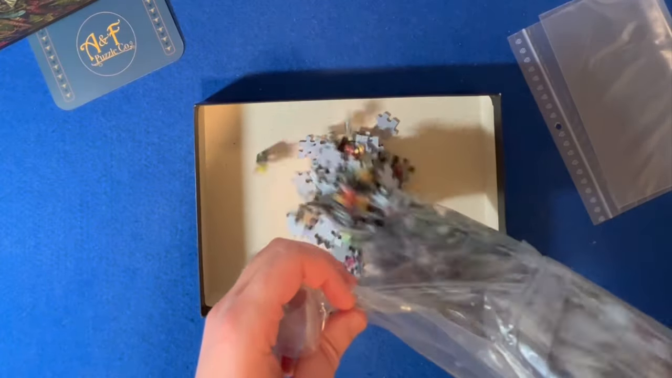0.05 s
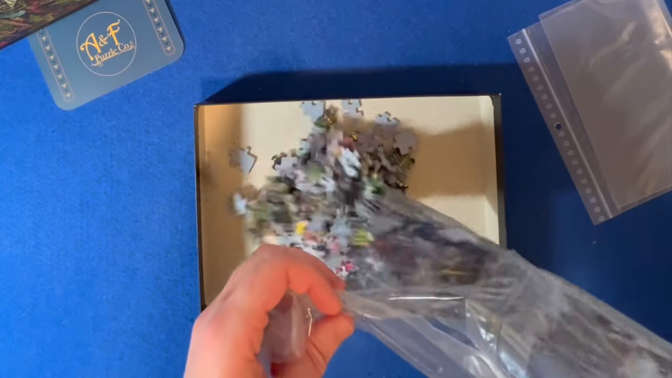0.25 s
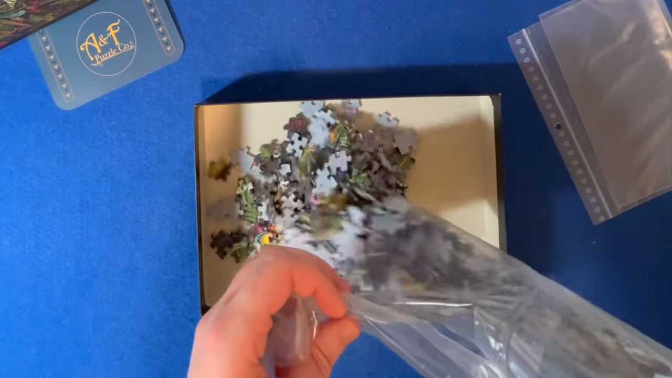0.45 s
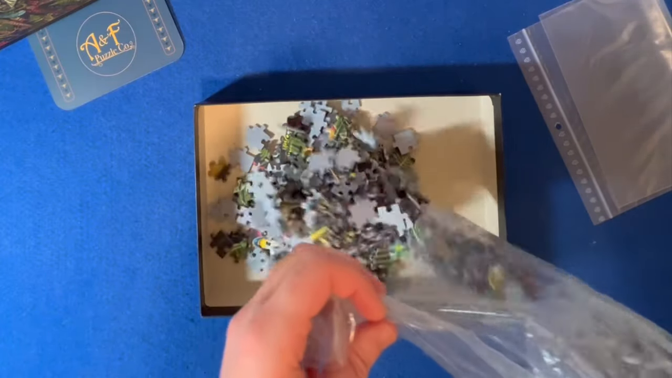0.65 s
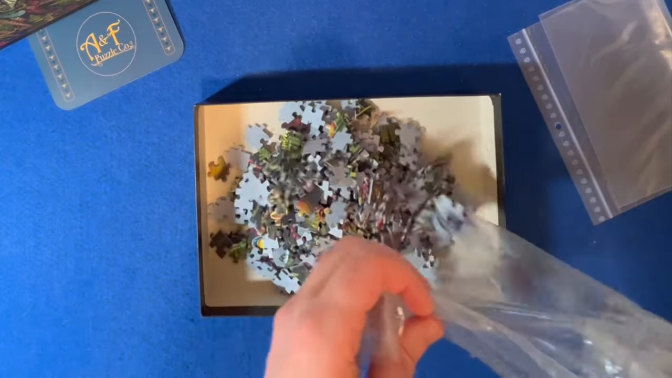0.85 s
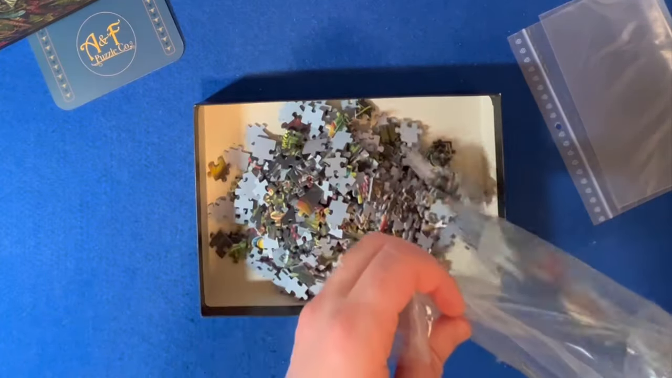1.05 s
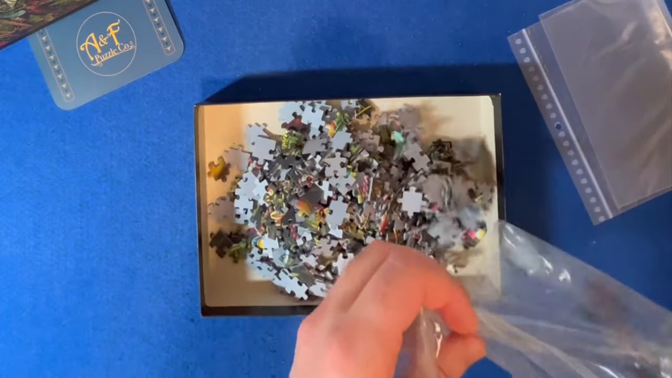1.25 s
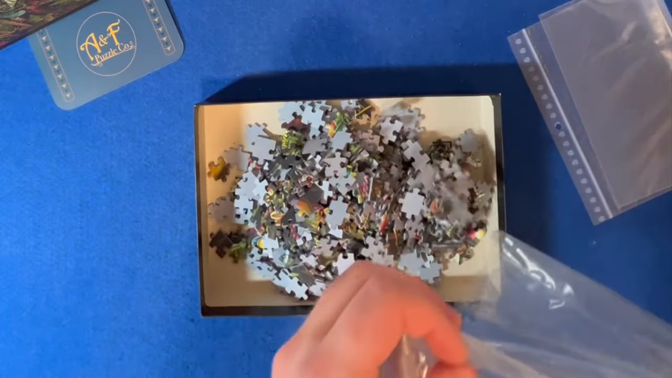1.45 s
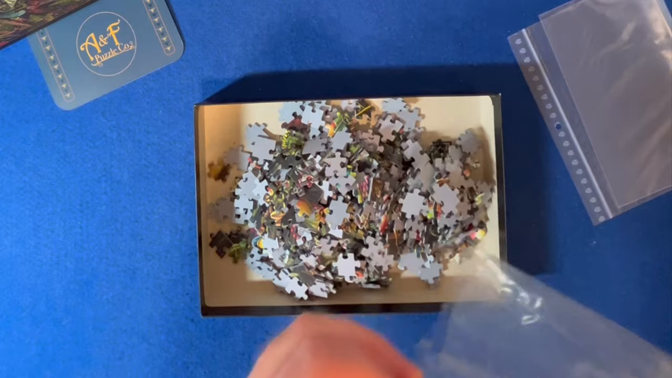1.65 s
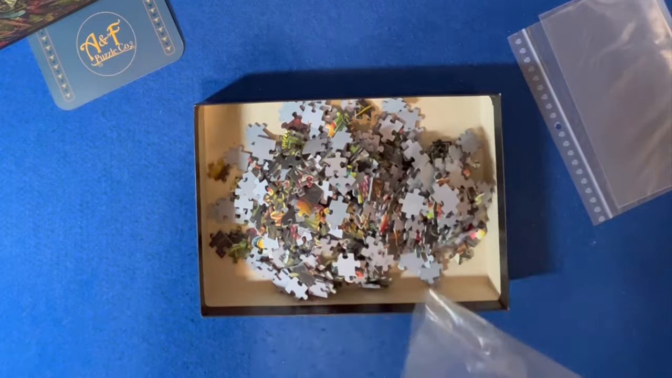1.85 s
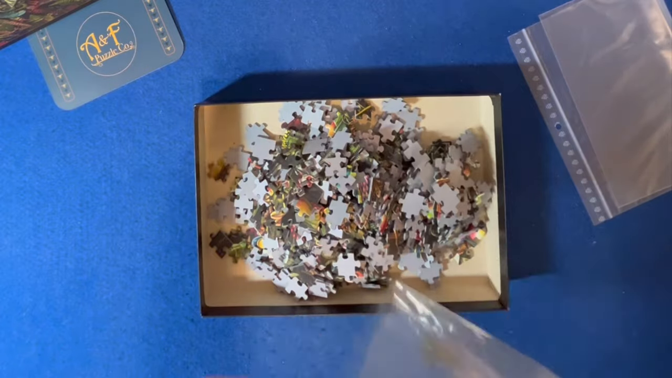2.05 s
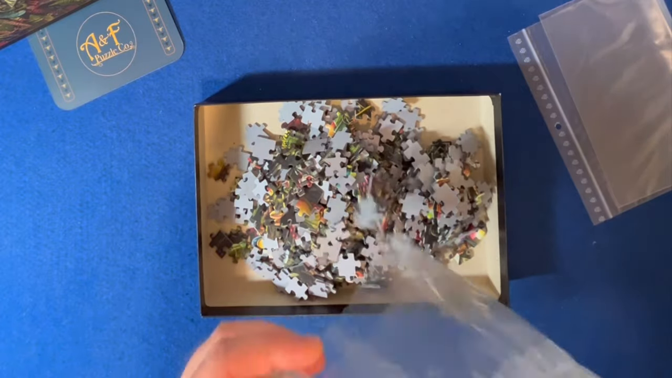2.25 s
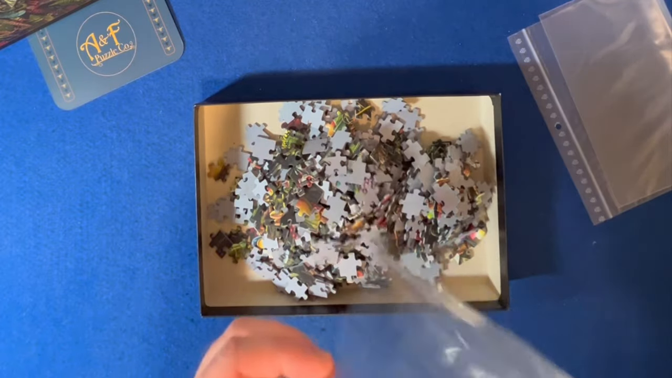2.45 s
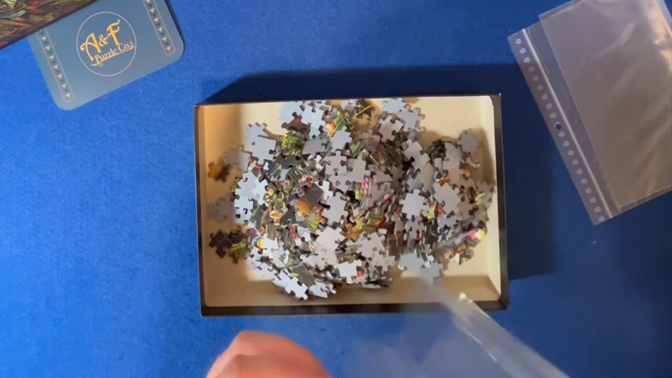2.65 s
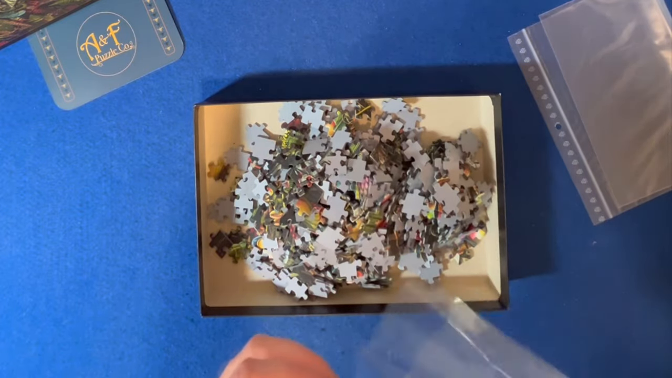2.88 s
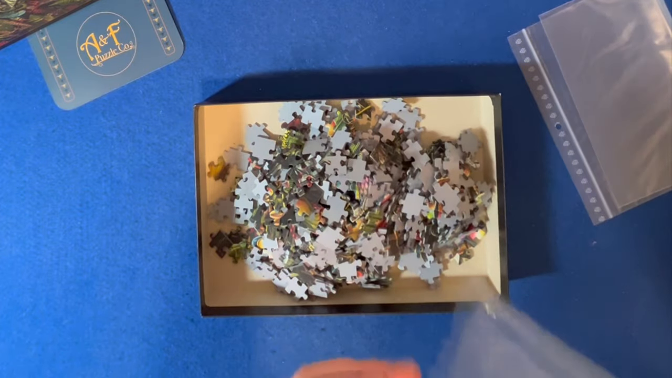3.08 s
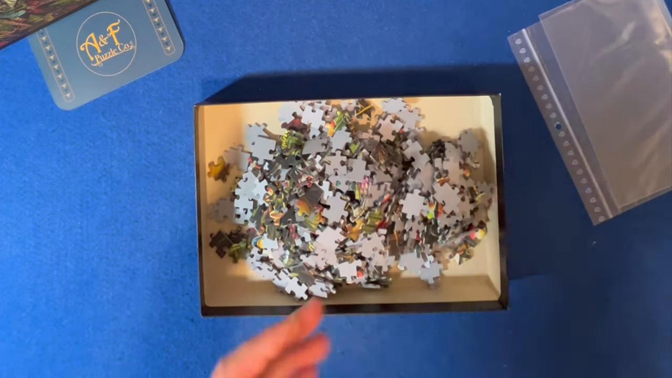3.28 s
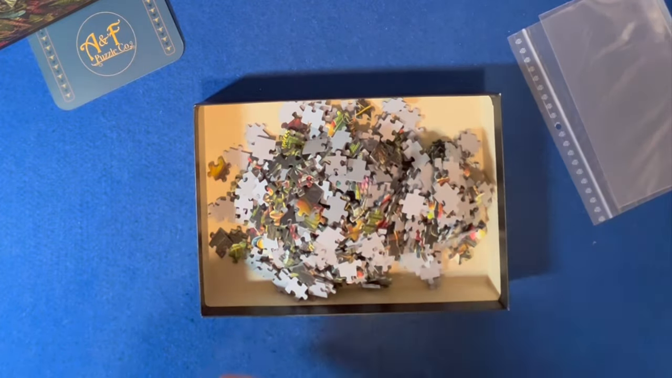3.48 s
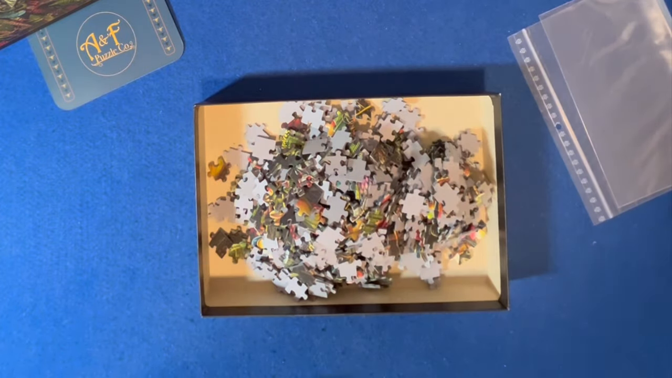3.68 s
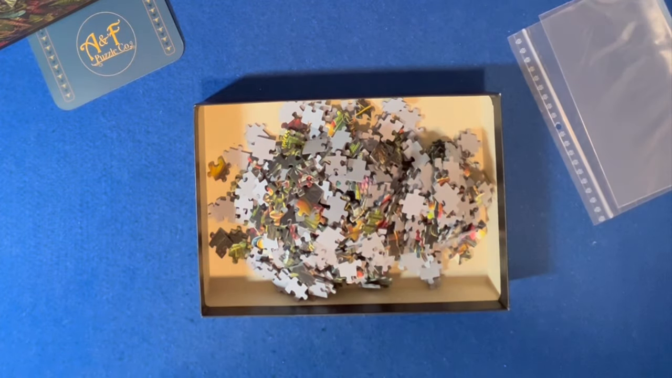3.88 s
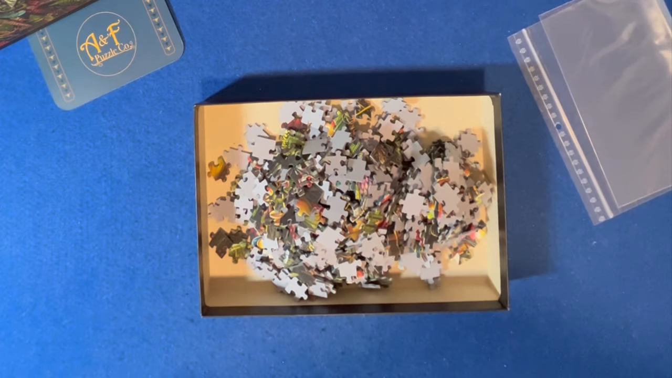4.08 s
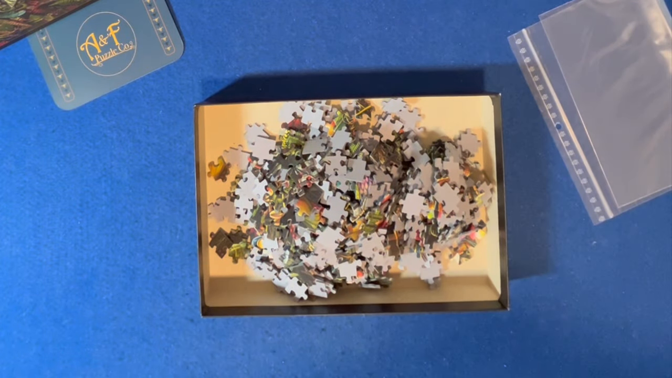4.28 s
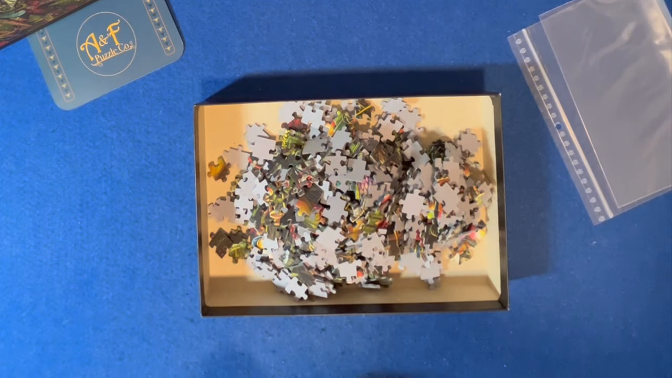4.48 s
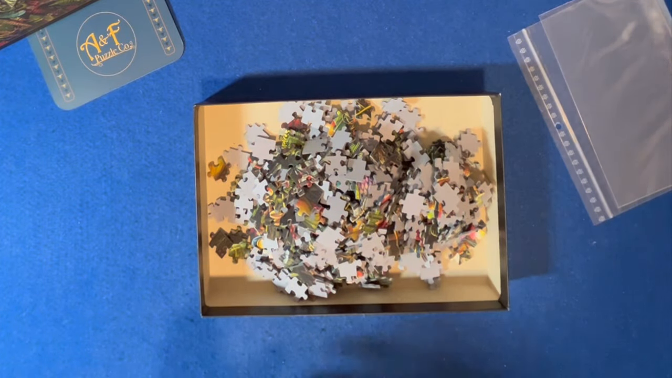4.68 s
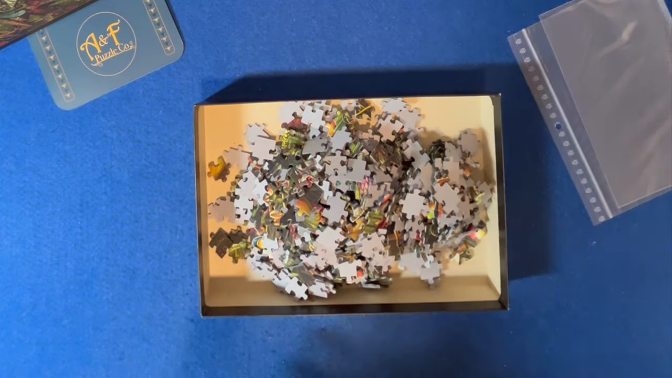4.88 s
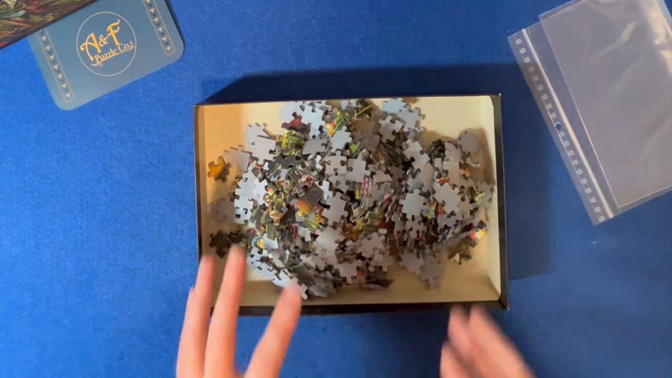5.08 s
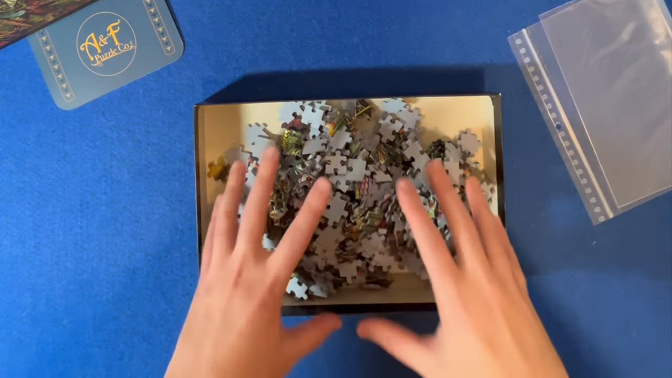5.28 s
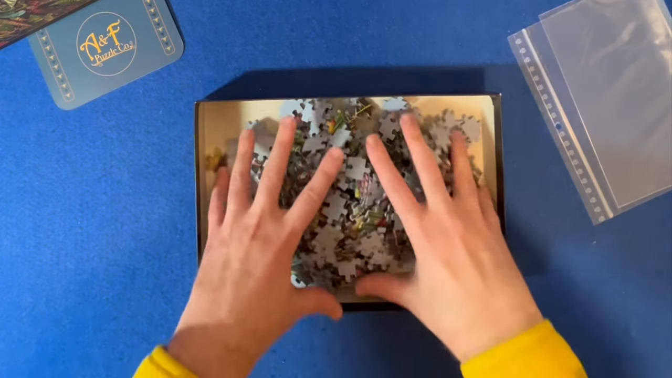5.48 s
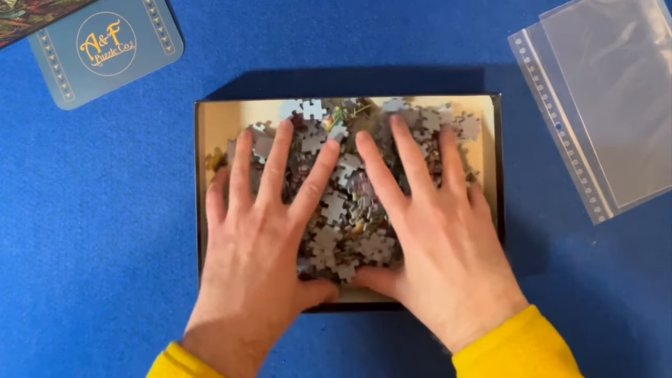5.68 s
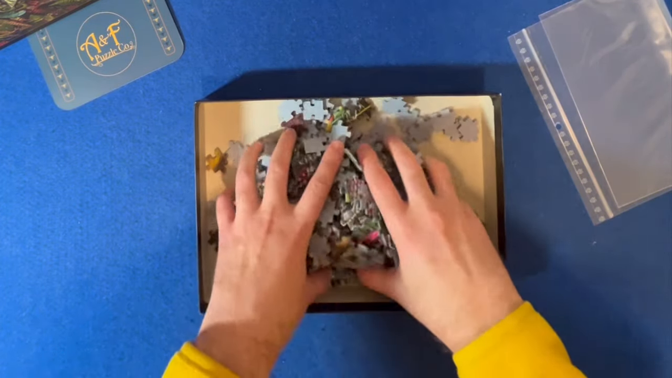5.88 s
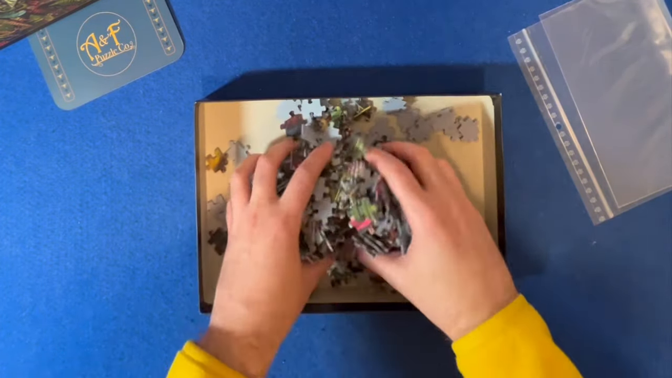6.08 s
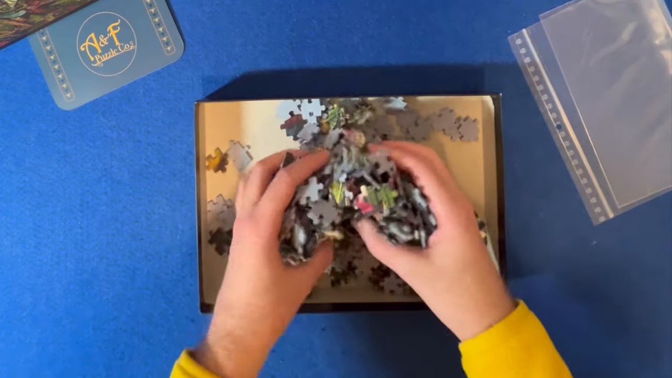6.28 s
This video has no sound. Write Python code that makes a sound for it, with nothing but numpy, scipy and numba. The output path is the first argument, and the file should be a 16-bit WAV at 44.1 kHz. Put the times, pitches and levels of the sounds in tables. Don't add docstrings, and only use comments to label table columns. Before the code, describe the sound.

Dense dry rattle of puzzle pieces tumbling into a cardboard box, thin plastic bag crinkling, a quiet pause, then softer clacking as fingers gather them.

```python
import sys
import numpy as np
from scipy import signal
from scipy.fft import rfft, irfft
from scipy.io import wavfile
from numba import njit

SR = 44100
rng = np.random.default_rng(int(sys.argv[2]) if len(sys.argv) > 2 else 0)


def attenuation_scalar(level_db):
    decades = np.asarray(level_db, float) / 20
    return 10 ** decades


def pcm_store(signal):
    levels = np.round(np.clip(np.atleast_2d(signal), -1, 1) * 32767)
    wavfile.write(sys.argv[1], SR, levels.astype(np.int16).T)


N = 279594

# (time [s], hold [s], pieces level [dB], box floor re pieces [dB], bag level [dB])
POUR_SURGES = [(0, 0.13, -29, -13.5, -39), (0.141, 0.15, -30.5, -16, -38.5),
               (0.324, 0.089, -37, -12, -43.5), (0.456, 0.036, -40, -3.5, -52.5),
               (0.539, 0.044, -41.5, -14, -44.5), (0.648, 0.038, -35.5, -5.5, -45.5),
               (0.718, 0.0044, -34.5, -6.5, -51.5), (0.767, 0.029, -27.5, -6.5, -36.5),
               (0.834, 0.07, -35.5, -7.5, -46.5), (0.936, 0.054, -41, -2, -45),
               (1.077, 0.015, -57, 15.5, -51.5), (1.122, 0.088, -43, -3.5, -48.5),
               (1.239, 0.0081, -47, -0.5, -54.5), (1.282, 0.023, -45.5, 0, -51),
               (1.35, 0.0064, -45.5, -8, -71), (1.425, 0.017, -58, 4, -59), (1.473, 0.04, -46, -2, -66),
               (1.62, .08, -73.5, 2, -84.5)]
# (time [s], hold [s], pieces level [dB], box floor re pieces [dB], skin and sleeve level [dB])
GATHER_PUSHES = [
    (5.369, 0.061, -58.5, 2.5, -65),
    (5.449, 0.0068, -50.5, 1, -50.5),
    (5.5, 0.086, -58.5, 6.5, -65.5),
    (5.649, 0.12, -53, -6, -59.5),
    (5.739, 0.067, -44.5, -1.5, -45),
    (5.819, .06, -43.5, 0, -44),
    (5.948, 0.083, -44, 4, -46.5),
    (6.071, .12, -44.5, -2, -48.5),
    (6.24, 0.29, -42, -8, -50.5),
]
# (time [s], peak [dB], pitch [Hz])
POUR_CLACKS = [(.0099, -10.5, 1750), (.0271, -13, 1750), (.0396, -18, 1720), (.0567, -16, 1760),
               (.1044, -13, 1610), (.1267, -18, 1550), (.1537, -18.5, 1450), (.168, -18, 1540),
               (.174, -9, 1570), (.1956, -16, 1550), (.2149, -14, 1650), (.2379, -18, 1870),
               (.2517, -14, 1790), (.2645, -19, 1930), (.2838, -17.5, 2100), (.2956, -18.5, 1670),
               (.3361, -22, 2090), (.3534, -15.5, 1600), (.3665, -16.5, 1850), (.4048, -24, 1490),
               (.4165, -24, 1500), (.4553, -26, 1840), (.54, -21, 1900), (.5585, -22, 1710),
               (.5833, -23, 2130), (.6186, -24, 1680),
               (0.6583, -15, 1630), (0.7153, -12, 1880), (0.7185, -19.5, 1840), (0.7455, -11.5, 1850),
               (0.757, -24, 1620), (0.7603, -12.5, 1590), (0.7646, -11, 1850), (0.7704, -10.5, 1880),
               (0.776, -18, 1830), (0.785, -20, 1990), (0.819, -21, 1480), (0.8469, -14, 1870),
               (0.936, -21.5, 1610), (0.9519, -18, 1890), (0.99, -28.5, 1660), (1.067, -24, 1620),
               (1.1234, -29, 1880), (1.1302, -23, 1840), (1.1628, -20.5, 1470), (1.1858, -28.5, 1430),
               (1.241, -32, 1500), (1.284, -24.5, 1850), (1.301, -23.5, 1850), (1.344, -30.5, 1850),
               (1.3513, -36.5, 1850), (1.475, -34.5, 1980), (1.491, -29.5, 1870)]
# (time [s], peak [dB], pitch [Hz])
HAND_CLACKS = [(5.3558, -64, 1520), (5.37, -49.5, 1940), (5.4059, -34.5, 1920), (5.4479, -28, 1660),
               (5.5246, -42.5, 1590), (5.5458, -36, 1680), (5.633, -38.5, 1800), (5.67, -48.5, 1830),
               (5.679, -48.5, 1560), (5.7077, -35.5, 1840), (5.7479, -28, 1890), (5.7572, -23, 1850),
               (5.764, -33, 1770), (5.7861, -23, 1900), (5.8272, -29, 1580), (5.9522, -24.5, 1790),
               (5.9649, -31.5, 1550), (5.983, -23, 1943), (6.0117, -26, 2017), (6.0314, -25, 1970),
               (6.0457, -30, 1717), (6.0765, -30.5, 1850), (6.0946, -32.5, 1601), (6.1102, -29, 1800),
               (6.1277, -32, 1685), (6.1478, -28.5, 1745), (6.1912, -30.5, 1530), (6.2227, -36, 1788),
               (6.2497, -30.5, 1640), (6.2612, -30.5, 1547), (6.2971, -34.5, 1850), (6.3304, -30.5, 1658)]
# (frequency [Hz], width [Hz], level [dB])
BOX_MODES = [(118.2, 20, 1), (241, 13, 3.5), (329, 27, 1), (375, 11, 5.5), (486, 40, -9)]
# (time [s], hold [s], rustle [dB], crackle re rustle [dB], thud re rustle [dB])
BAG_SHAKES = [(1.57, 0.04, -78.5, -27.5, 20), (1.72, 0.0085, -93, -4.5, 0),
              (1.82, 0.093, -59.5, -11.5, 1.5), (1.92, 0.027, -50, -14.5, 2.5),
              (1.99, 0.02, -47.5, -27, -1), (2.08, 0.039, -49.5, -13.5, -3.5), (2.13, 0.09, -49, -14, -1.5),
              (2.26, 0.056, -51.5, -5, 6.5), (2.34, 0.08, -52.5, -17, -2.5), (2.49, 0.012, -49, -14.5, 2.5),
              (2.56, 0.014, -50, -16.5, 2), (2.65, 0.013, -46, -16, 3), (2.72, 0.02, -51, -21, 3.5),
              (2.82, 0.0059, -52.5, -12.5, 4.5), (2.9, 0.015, -56, -16, 8), (2.99, 0.042, -52, -11.5, -0.5),
              (3.11, 0.0087, -53.5, -7, -7.5), (3.18, 0.021, -53.5, -25, 2.5)]
# (time [s], hold [s], rustle [dB], crackle re rustle [dB], thud re rustle [dB])
SLOW_MOVES = [(3.34, 0.019, -90.5, -3.5, 7.5), (3.51, 0.057, -87.5, -2.5, 8),
              (3.69, 0.052, -64.5, -18, -0.5), (4.11, 0.027, -65.5, -12.5, -1),
              (4.19, 0.033, -66.5, -7.5, -8), (4.29, 0.043, -59, -10, -6.5), (4.44, 0.0139, -64, -32, -3.5),
              (4.8, 0.15, -70, -13, -5), (4.97, 0.047, -63.5, -31, -1), (5.06, 0.0315, -82.5, 3.5, 19),
              (5.19, 0.023, -65.5, -30, -1)]
# (time [s], peak [dB], thin top re peak [dB])
TICKS = [(0.0094, -23.5, -13), (0.1118, -45, -10), (0.122, -19, -18), (0.171, -29, -4), (0.2138, -28, 11.5),
         (0.2462, -27, -4), (0.2627, -27, -6), (0.2821, -36, -6), (0.3281, -34, -6), (0.3521, -22.5, -8),
         (0.3643, -25, -10), (0.3846, -37, -6), (0.4037, -32, -6), (0.4119, -23, -8), (0.5386, -30, -16),
         (0.543, -29, -10), (0.5821, -29, -12), (0.5926, -38, -10), (0.7726, -27.5, -6),
         (0.837, -23.5, -14), (0.8472, -23, -6), (0.8645, -29, -6), (0.9055, -27.5, -1), (0.95, -32, -6),
         (0.9663, -35.5, 7), (1.0378, -26.5, -3), (1.067, -27, -4), (1.1057, -25.5, -6), (1.1415, -24, -6),
         (1.1816, -25, -8), (1.2057, -25, -1), (1.2402, -33, -3), (1.258, -29.5, -6), (1.3236, -32, -8),
         (1.4072, -29, -6), (1.4278, -25.5, -2), (1.4477, -28.5, -6), (1.5235, -40, -3.5),
         (5.4041, -44, -7), (5.4465, -43, -9), (5.5452, -50, 2), (5.5967, -50, -6), (5.6865, -45, -4),
         (5.7049, -42, -4), (5.7868, -31, -6), (5.8274, -26.5, -4), (5.859, -34.5, -1), (5.8985, -44, -6),
         (5.9547, -39.5, -6), (6.0102, -39, -6), (6.0696, -37, -6), (6.1105, -34, -9), (6.132, -37, -6),
         (6.1478, -34.5, -8), (6.2224, -39, -10), (6.2627, -37.5, -6), (6.3304, -37, -10)]
# (time [s], peak [dB], bright re peak [dB], dull re peak [dB], ring [Hz])
NEAR_SNAPS = [(1.6868, -65, -4, -20, 3500), (1.7136, -59.5, -21, -6, 1500), (1.743, -60, -9, -21, 3500),
              (1.765, -62.5, -8.5, -20.5, 3500), (1.8128, -57, -29, 11.5, 1440),
              (1.8392, -44, -7, -1, 2500), (1.8895, -46.5, 0.5, -10, 2970), (1.918, -43.5, 0, 0, 1300),
              (1.931, -27, -2, -14, 3000), (1.9687, -44, -3, 5, 1280), (2.0655, -39.5, -2, -3.5, 1790),
              (2.1338, -34, -36, 3, 1790), (2.143, -34.5, -28, -11, 1500), (2.167, -39, 1.5, -15, 3000),
              (2.1728, -38.5, -1.5, -14, 1335), (2.195, -46.5, -0.5, -10, 2000), (2.2417, -39, 3, -7, 3000),
              (2.255, -45, 0, -6, 2500), (2.2659, -41, 1.5, -4, 4000), (2.287, -42.5, -12.5, -12, 1520),
              (2.352, -38, -6, -23, 1480), (2.4714, -48, -7, -1, 2500), (2.2383, -39, 1, -2, 1600),
              (2.2809, -34.5, -7, 2, 1700), (2.3481, -38.5, 4, -21, 3630), (2.488, -39, -8, -0.5, 1400),
              (2.5028, -34, -0.5, -5, 3700), (2.5512, -33.5, -16.5, -11, 1610),
              (2.5642, -33, -24, -20, 1790), (2.5872, -33, -29, -31, 3040), (2.6472, -34, -14.5, -10, 3350),
              (2.6785, -33, -20.5, -22.5, 1940), (2.72, -38, -9.5, -4.5, 3310),
              (2.7407, -35, -48, -7, 1640), (2.804, -39, -16.5, -12, 1740),
              (2.8286, -36, -10.5, -2.5, 1660), (2.9912, -30, -11, -16, 4360), (3.003, -28, -9, -11, 2540),
              (3.109, -32.5, -9, -22.5, 2360), (3.1743, -55, -13, -10.5, 3560),
              (3.2486, -57, 3, -11.5, 3500), (3.1871, -34, -49, -9, 1750)]
# (time [s], peak [dB], bright re peak [dB], dull re peak [dB], ring [Hz])
FAR_SNAPS = [(3.3343, -53.5, -11.5, -22.5, 2624), (3.5117, -61, -14, -19, 1444),
             (3.636, -67, 1, -21.5, 2980), (3.907, -69, -4.5, -19, 3040), (4.0525, -62.5, -5, -21.5, 2530),
             (4.9207, -66.5, -10, -14.5, 1690), (3.6842, -42.5, -26, -20.5, 1660),
             (4.101, -51, -25.5, -18, 3960), (4.1815, -47, -1, -22, 2620), (4.2875, -46, -0.5, -14.5, 3040),
             (4.4302, -53.5, -24, -4, 1443), (4.9738, -58, -6, 4, 1600)]
# (time [s], peak [dB], pitch [Hz], swell [s])
CHIRPS = [
    (2.265, -41, 7600, 0.0018),
    (2.339, -42, 8650, 0.0092),
    (2.348, -40, 8760, .003),
    (5.827, -35, 7600, 0.0018),
]
# (time [s], peak [dB], pitch [Hz])
KNOCKS = [(0.66, -26.5, 250), (0.16, -36, 234), (.17, -32.5, 360), (0.89, -37.5, 245), (4.5, -51.5, 118),
          (5.045, -48, 112), (4.5, -52, 100), (3.71, -46.5, 124), (3.688, -55, 153), (4.436, -51, 124),
          (5.191, -48, 89.5), (5.364, -48.5, 390), (5.5, -47.5, 369.6), (5.45, -31, 98.3),
          (5.744, -23.5, 81), (6, -29.5, 126.8), (5.85, -28.5, 376), (5.7575, -27.5, 126),
          (5.8414, -30, 69.1), (6.001, -41, 227)]
# (frequency [Hz], level [dB], t60 [s])
EDGE_MODES = [(246, -3.5, 0.17), (596, 5, 0.015), (1400, -1, 0.033), (1740, -0.5, 0.027), (2340, 0, 0.03)]
# (frequency [Hz], level [dB])
FILM = [(3500, -30), (5200, 2.5), (7800, 0.5), (9500, 0.5), (12000, -7.5), (14000, -14), (16000, -14.5),
        (17000, -45.5)]
# (frequency [Hz], level [dB])
SHEEN = [(9000, -32), (11000, 0), (13000, -3), (15000, -4), (16200, -6.5)]
# (frequency [Hz], level [dB])
SWISH = [(900, -24.5), (1500, -1), (2200, 1), (3500, 0.5), (5300, -3), (7500, -23)]
# (frequency [Hz], level [dB])
RUSTLE = [(150, -19), (235, 3), (330, -3.5), (560, -3.5), (900, -1), (1400, -10), (2200, -44)]
# (frequency [Hz], level [dB])
THUD = [(22, -32.5), (40, -9.5), (70, 1), (120, -3.5), (180, -5), (300, -44)]
# (frequency [Hz], density [dB per Hz])
AIR = [(18, -37), (30, -4), (121, -3), (404, -22), (666, -22.5), (889, -27), (7870, -34), (10200, -38),
       (12600, -31.5), (16000, -70)]
# (frequency [Hz], left port lead [rad])
PORT_LEAD = [(0, 0), (430, -0.6), (950, 1.0), (1460, -0.2), (2580, 2.8), (3960, 1.2), (4910, 2.9),
             (6290, 3.6), (9730, 8.9), (10900, 10.1), (11900, 12.2), (13000, 12.7), (14000, 15.3),
             (16100, 16.4)]
# (frequency [Hz], left minus right [dB])
PORT_TILT = [(60, 3), (110, -3), (200, -3), (380, -4), (700, -1.5), (1290, 0.5), (2380, -2), (4400, -2),
             (8120, -0.5), (15000, 0)]

BARE_HZ, PIECE_HZ, COVERED_S = 1620, 1850, 0.057
BOUNCE_S, BOUNCE_DB = 0.0045, -7.5
RISE_DB_S, FALL_DB_S = 500, 252.5
SLOW_RISE_DB_S, SLOW_FALL_DB_S = 352, 181.5
THUD_RATE_SHARE = 0.61
SWISH_DB, SWISH_SHARE = 1.5, 0.38
POUR_CRACKLE_DB, POUR_THUD_DB = -6, -1.5
GATHER_CRACKLE_DB, GATHER_THUD_DB = -13, 0
STEADY_DB, CRACKLE_STEADY_SHARE, THUD_STEADY_SHARE = -45.5, 0.45, 0.59
FAR_FROM_S, FAR_TO_S = 3.3, 5.3
TAP_S, TAP_DB = 5.1805, -48
ROOM_T60_S, ROOM_DB, ROOM_LOW_HZ, ROOM_TOP_HZ = 0.038, -13, 330, 3960
AIR_DB = -63 - 8
TOP_HZ = 16250


def unit(x):
    return x / np.sqrt(np.mean(x ** 2) + 1e-30)


def colour(x, points):
    hz, db = np.transpose(points)
    log_f = np.log(np.fft.rfftfreq(N, 1 / SR) + 1)
    return irfft(rfft(x) * attenuation_scalar(np.interp(log_f, np.log(hz), db)), N)


def crowd(count, spread_db):
    chance = rng.random((count, 2))
    rarity = -np.log(1 - 0.93 * chance[:, 1])
    return chance[:, 0] * N / SR, attenuation_scalar(spread_db * rarity), rng.standard_normal((count, 2))


def bursts(s, size, pan_db, length_s, apart=0.):
    gate = np.zeros((2, N))
    at = np.clip((s * SR).astype(int), 0, N - 1)
    np.add.at(gate, (slice(None), at), size * attenuation_scalar(np.array([pan_db, -pan_db]) / 2))
    fall = np.exp(-1 / (length_s * SR))
    rise = np.exp(-1 / (0.75 * length_s * SR))
    gate = signal.lfilter([2 * (1 - rise)], np.convolve([1, -fall], [1, -rise]), gate)
    return gate * (rng.standard_normal(N) + apart * rng.standard_normal((2, N)))


@njit
def wavelets(s, size, hz, cycles, left, lag):
    out = np.zeros((2, N + 3600))
    for k in range(len(s)):
        tau = cycles[k] / hz[k] * SR
        for c in range(2):
            start = max(s[k] * SR + c * lag[k], 0.)
            gain = size[k] * (left[k] if c == 0 else 1 / left[k])
            for i in range(int(start) + 1, int(start + min(5 * tau, 3500.))):
                u = (i - start) / tau
                out[c, i] += gain * (u * np.exp(1 - u)) ** 2 * np.sin(2 * np.pi * cycles[k] * u)
    return out[:, :N]


def moves(table, db, rise_db_s, fall_db_s):
    t = np.arange(0, N, 32) / SR
    s, hold = np.transpose(table)[:2, :, None]
    before, after = np.maximum(s - t, 0), np.maximum(t - s - hold, 0)
    shape_db = db[:, None] - rise_db_s * before - fall_db_s * after
    return np.interp(np.arange(N) / SR, t, np.sqrt(np.sum(attenuation_scalar(shape_db) ** 2, axis=0)))


def heap():
    surges = POUR_SURGES + GATHER_PUSHES
    _, _, piece_db, box_db, _ = np.transpose(surges)
    patter_gain = moves(surges, piece_db, RISE_DB_S, FALL_DB_S)
    drum_gain = moves(surges, piece_db + box_db, RISE_DB_S, FALL_DB_S)

    s, size, chance = crowd(count=6000, spread_db=5.0)
    hz = np.interp(s, [0, COVERED_S], [BARE_HZ, PIECE_HZ]) * np.exp(0.15 * chance[:, 0])
    side = chance[:, 1]
    patter = wavelets(s, size, hz, np.full(len(s), 1.1), attenuation_scalar(1.8 * side), 1.5 * side)

    s, size, chance = crowd(count=1500, spread_db=5.0)
    blows = bursts(s, size, 0.5 * chance[:, 0], 0.00056)
    floor = 0
    for hz, width_hz, db in BOX_MODES:
        floor = floor + attenuation_scalar(db) * unit(signal.lfilter(*signal.iirpeak(hz, hz / width_hz, SR), blows))
    return attenuation_scalar(0.5) * patter_gain * unit(patter) + attenuation_scalar(0.2) * drum_gain * unit(floor)


def clacks():
    s, db, hz = np.transpose(POUR_CLACKS + HAND_CLACKS)
    delay, loss, bend = rng.standard_normal((len(s), 3)).T
    s = np.append(s, s + BOUNCE_S * np.exp(0.5 * delay))
    db = np.append(db, db + BOUNCE_DB + 1.5 * loss)
    hz = np.append(hz, hz * np.exp(0.081 * bend))
    s = s - 0.0001
    side, damp = rng.standard_normal((len(s), 2)).T
    body = wavelets(s, attenuation_scalar(db + 0.5), hz, 1.25 * np.exp(0.15 * damp), attenuation_scalar(0.57 * side), 1.3 * side)
    scrape = colour(bursts(s, attenuation_scalar(db), 4.9 * side, 0.00055), SWISH)
    return body + attenuation_scalar(-9) * scrape


def surge_levels(table, crackle_db, thud_db):
    rustle_db = np.transpose(table)[-1]
    to_steady_db = STEADY_DB - rustle_db
    return (rustle_db, crackle_db + CRACKLE_STEADY_SHARE * to_steady_db,
            thud_db + THUD_STEADY_SHARE * to_steady_db)


def handling():
    quick, slow = (RISE_DB_S, FALL_DB_S), (SLOW_RISE_DB_S, SLOW_FALL_DB_S)
    gestures = [
        (POUR_SURGES, surge_levels(POUR_SURGES, POUR_CRACKLE_DB, POUR_THUD_DB), slow),
        (GATHER_PUSHES, surge_levels(GATHER_PUSHES, GATHER_CRACKLE_DB, GATHER_THUD_DB), slow),
        (BAG_SHAKES, np.transpose(BAG_SHAKES)[2:], quick),
        (SLOW_MOVES, np.transpose(SLOW_MOVES)[2:], slow)]
    power = 0
    for table, (rustle_db, crackle_db, thud_db), (rise, fall) in gestures:
        swish_db = rustle_db + SWISH_DB + SWISH_SHARE * crackle_db
        gains = [moves(table, rustle_db + crackle_db, rise, fall),
                 moves(table, rustle_db, rise, fall),
                 moves(table, swish_db, rise, fall),
                 moves(table, rustle_db + thud_db, THUD_RATE_SHARE * rise, THUD_RATE_SHARE * fall)]
        power = power + np.array(gains) ** 2
    return np.sqrt(power)


def pops(count, hz, octaves):
    s, size, chance = crowd(count=count, spread_db=7.0)
    pitch_hz = hz * 2 ** (octaves * chance[:, 0])
    side = chance[:, 1]
    return unit(wavelets(s, size, pitch_hz, np.full(count, 1.3), attenuation_scalar(4.7 * side), 8.4 * side))


def hands():
    film_gain, rustle_gain, swish_gain, thud_gain = handling()
    t = np.arange(N) / SR
    far = (t > FAR_FROM_S) & (t < FAR_TO_S)
    slide = rng.standard_normal((3, N)) * np.where(far, 1.8, 1)

    s, size, chance = crowd(count=4000, spread_db=2.0)
    slips = unit(bursts(s, size, 1.1 * chance[:, 0], 0.00098, apart=0.8))
    slips = slips + 0.5 * (slide[0] + 0.72 * slide[1:])
    s, size, chance = crowd(count=2200, spread_db=0.5)
    folds = unit(bursts(s, size, 3.8 * chance[:, 0], 0.0016, apart=1.0)) + 0.28 * slide[1:]

    film = slips.mean(axis=0) + 0.16 * (slips[0] - slips[1]) * np.array([[1], [-1]])
    swish = unit(colour(slips + 0.2 * folds, SWISH))
    swish = swish + np.where(far, 0.4, 1.05) * pops(count=3000, hz=3100, octaves=0.55)
    rustle = unit(colour(folds + 0.25 * slips, RUSTLE)) + 0.36 * pops(count=1200, hz=710, octaves=0.6)
    thud = unit(colour(0.34 * folds.mean(axis=0) + slide[0] + 0.2 * slide[1:], THUD))

    out = attenuation_scalar(4.5) * film_gain * unit(colour(film, FILM))
    out += attenuation_scalar(1.0) * swish_gain * swish
    out += attenuation_scalar(-0.46) * rustle_gain * rustle
    return out + attenuation_scalar(-1.7) * thud_gain * thud


def ticks():
    s, db, top_db = np.transpose(TICKS)
    side = rng.standard_normal(len(s))
    body = bursts(s, attenuation_scalar(db), 1.6 * side, 0.0012, apart=0.34)
    top = bursts(s, attenuation_scalar(db + top_db), 1.4 * side, 0.0007, apart=0.25)
    return attenuation_scalar(-1.0) * colour(body, FILM) + attenuation_scalar(-17.5) * colour(body, SWISH) + attenuation_scalar(1.5) * colour(top, SHEEN)


def snaps():
    s, db, bright_db, dull_db, hz = np.transpose(NEAR_SNAPS + FAR_SNAPS)
    side = rng.standard_normal(len(s))
    ring = wavelets(s, attenuation_scalar(db), hz, 0.00063 * hz, attenuation_scalar(1.8 * side), 3.5 * side)
    bright = bursts(s, attenuation_scalar(db + bright_db), 1.0 * side, 0.000817)
    wash = bursts(s, attenuation_scalar(db) * (s > FAR_FROM_S), side, 0.02, apart=1.0)
    middle = bursts(s, attenuation_scalar(db + 0.22 * bright_db), 3 * side, 0.0017, apart=1.0)
    dull = bursts(s, attenuation_scalar(db + dull_db), 3 * side, 0.0048, apart=0.24)
    out = ring + attenuation_scalar(6.5) * colour(bright, FILM)
    out += attenuation_scalar(-7.5) * colour(wash, SWISH) + attenuation_scalar(-30.0) * colour(wash, RUSTLE)
    return out + attenuation_scalar(0.5) * colour(middle, SWISH) + attenuation_scalar(9.5) * colour(dull, RUSTLE)


def chirps():
    s, db, hz, swell_s = np.transpose(CHIRPS)
    return wavelets(s, attenuation_scalar(db), hz, hz * swell_s, np.ones(len(s)), np.zeros(len(s)))


def knocks():
    s, db, hz = np.transpose(KNOCKS)
    return wavelets(s, attenuation_scalar(db - 4.5), hz, (hz / 105) ** 1.92, np.ones(len(s)), np.zeros(len(s)))


def tap():
    t = np.maximum(np.arange(N) / SR - TAP_S, 0)
    attack = np.minimum(t / 0.001, 1)
    out = 0
    for hz, db, t60_s in EDGE_MODES:
        out = out + attenuation_scalar(TAP_DB + db - 60 * t / t60_s) * np.sin(2 * np.pi * hz * t) * attack
    return out


def room(x):
    t = np.arange(SR // 2) / SR
    late = t > 0.0015
    tail = rng.standard_normal((2, len(t))) * attenuation_scalar(-60 * t / ROOM_T60_S) * late
    tail = irfft(np.exp(1j * np.angle(rfft(tail))), len(t)) * attenuation_scalar(-30 * t / ROOM_T60_S) * late
    band = signal.butter(2, [ROOM_LOW_HZ, ROOM_TOP_HZ], "bandpass", fs=SR, output="sos")
    tail = signal.sosfilt(band, tail)
    tail = tail / np.sqrt(np.sum(tail ** 2) / 2)
    return attenuation_scalar(ROOM_DB) * signal.fftconvolve(x, tail, axes=1)[:, :N]


def air():
    noise = rng.standard_normal(N) + 1.6 * rng.standard_normal((2, N))
    return attenuation_scalar(AIR_DB) * unit(colour(noise, AIR))


def scene():
    near = heap() + clacks() + hands() + ticks() + snaps() + chirps() + knocks() + tap()
    return near + room(near) + air()


def roll_off(x):
    return signal.sosfilt(signal.butter(12, 16550, fs=SR, output="sos"), x)


def record(dry):
    f = np.fft.rfftfreq(N, 1 / SR)
    lead = np.interp(f, *np.transpose(PORT_LEAD))
    tilt_db = np.interp(f, *np.transpose(PORT_TILT))
    half = np.exp(0.5j * lead) * attenuation_scalar(tilt_db / 2)
    mix = irfft(rfft(dry) * np.array([half, 1 / half]) * (f < TOP_HZ), N)
    return roll_off(mix)


dry = scene()
out = record(dry)
pcm_store(out)
```